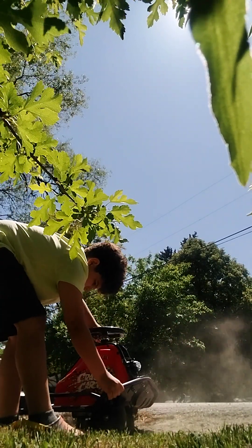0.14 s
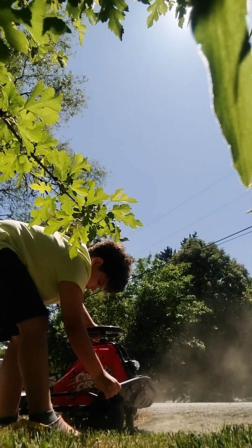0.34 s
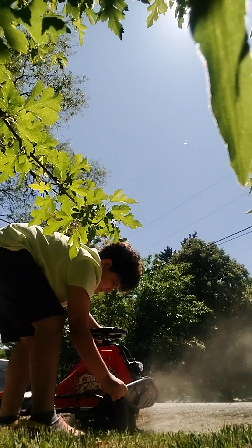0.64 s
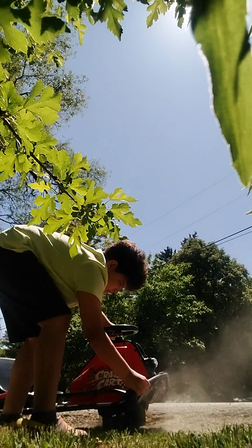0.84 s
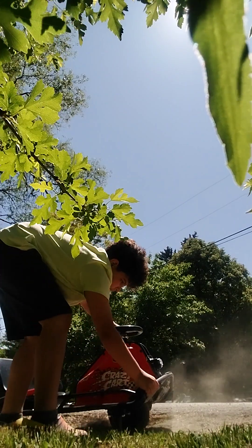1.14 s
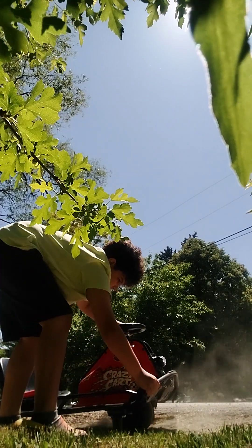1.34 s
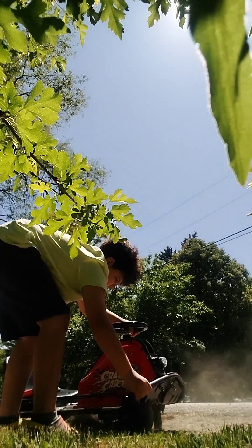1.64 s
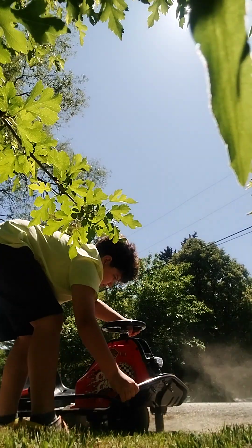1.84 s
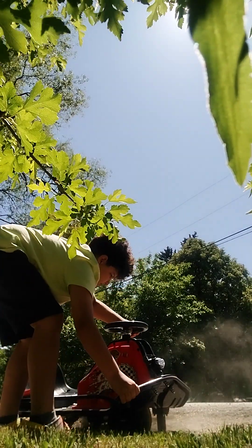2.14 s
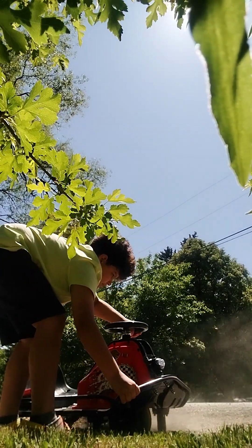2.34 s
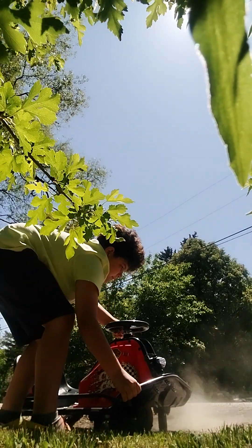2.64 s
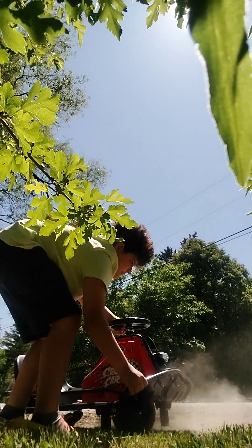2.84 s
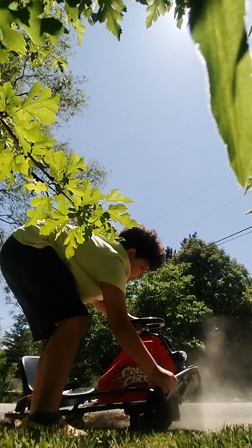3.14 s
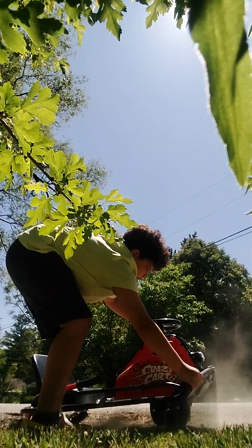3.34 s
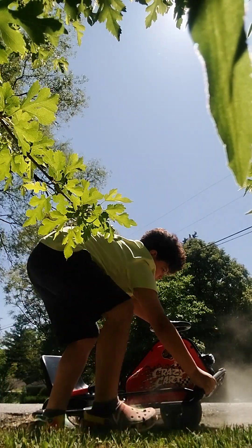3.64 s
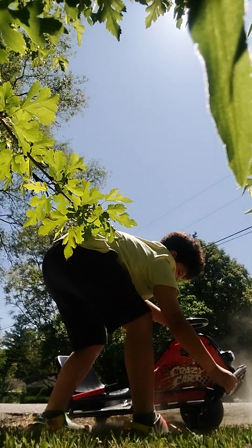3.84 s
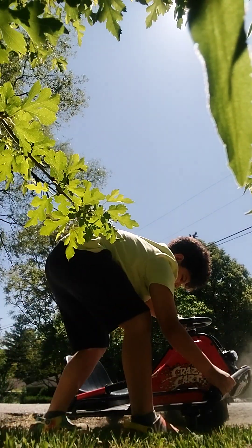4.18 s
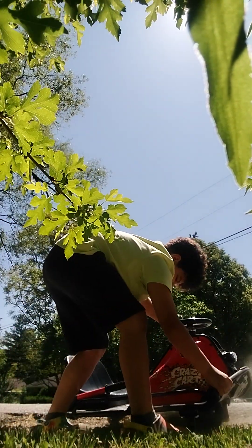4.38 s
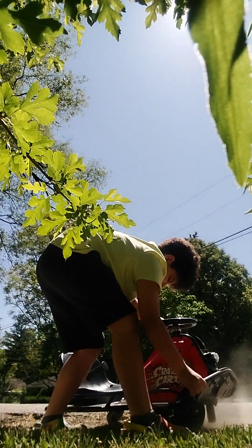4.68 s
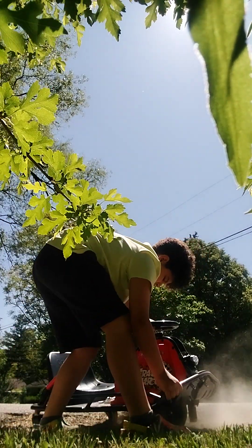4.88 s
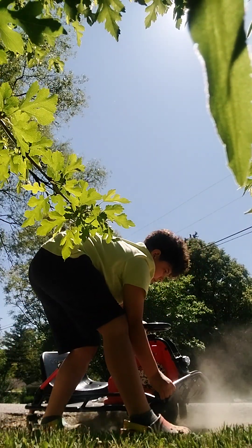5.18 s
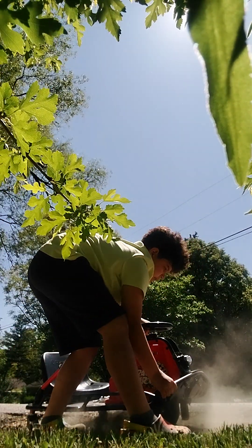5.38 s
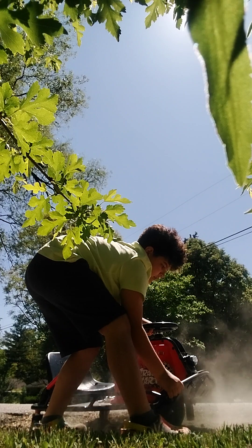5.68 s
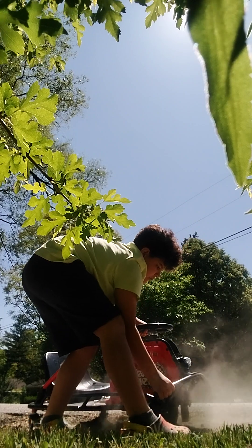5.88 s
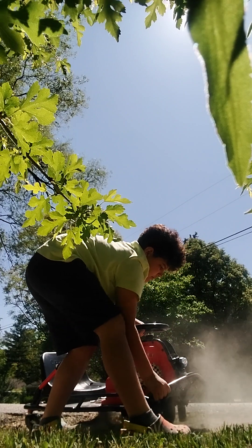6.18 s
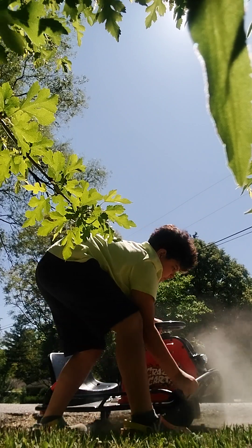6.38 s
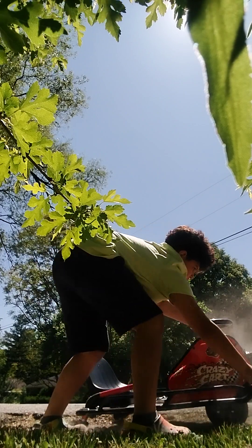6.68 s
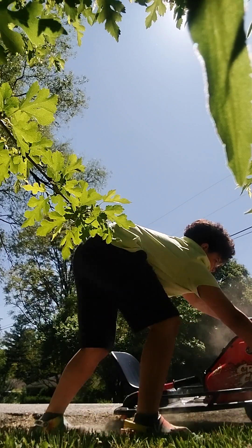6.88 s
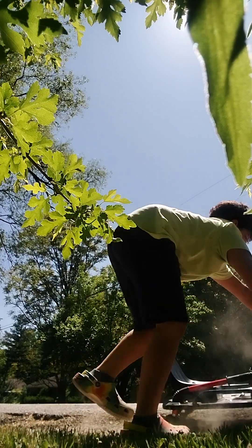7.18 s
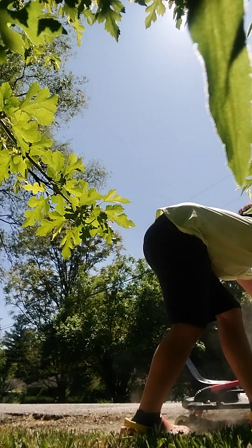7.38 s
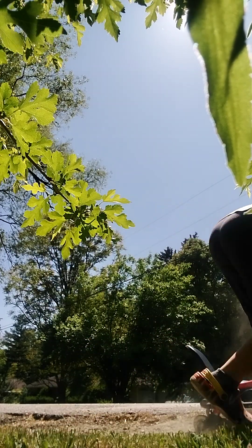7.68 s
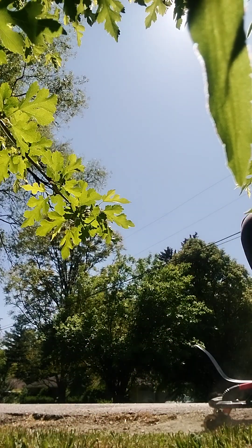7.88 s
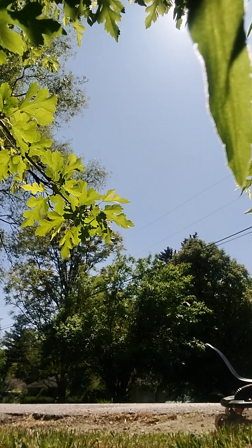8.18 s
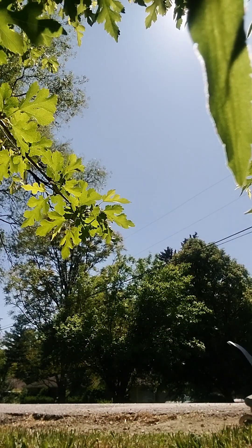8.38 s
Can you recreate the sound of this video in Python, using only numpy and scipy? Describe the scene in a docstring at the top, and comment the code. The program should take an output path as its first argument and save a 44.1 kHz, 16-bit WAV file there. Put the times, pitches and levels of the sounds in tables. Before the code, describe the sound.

Outdoors on a gritty road edge, heard close in phone-like stereo. From 0 s a small electric kart is held back while its wheel spins: hissing grit, stuttering hollow drumming around 250 Hz and a mid-range steel rattle, with thin high motor rings fading by 1.5 s. A few stones ping early and near 3.2 s. Chain whine sags from about 380 to 280 Hz in the first 0.9 s; it returns higher, 410-500 Hz, at 2.1-3 s, then lower near 4, 5.2 and 6.2 s. A rough narrow squeal near 1.9 kHz sounds at 1.6-2.7 s, with a bright grit puff at 2.4 s. Hard thuds crowd 2-6.9 s. From 7 s the noise falls away to a faint breathy whirr, ticks and a soft drag at 8 s. At 8.3 s the wheel bites again, rattling to the end. A faint 78 Hz distant machine hum, traffic and leaves persist throughout.

```python
"""From the start a small electric kart is held back while its drive wheel spins and skips on a gritty road edge.
Noise through resonances makes the tyre drum the hollow shell, the frame rattle and the grit hiss; shaken sines
make thin motor rings at first, then a rough squeal. Landings thud, stones ping, and chain whine comes in spells.
Near the end the wheel coasts with a whirr and ticks of filtered noise, then bites again.
A distant machine, a few harmonics, and a noise bed of far traffic and leaves lie under it throughout."""
import sys
import numpy as np
from scipy import signal
from scipy.fft import rfft, irfft, next_fast_len
from scipy.io import wavfile
from scipy.ndimage import map_coordinates

SR = 44100
rng = np.random.default_rng(int(sys.argv[2]) if len(sys.argv) > 2 else 0)


def wrap_up_sound(samples):
    """Save the sound to the file named by the first command line argument, as 16-bit audio."""
    columns = np.atleast_2d(samples).T
    # keep every value between -1 and 1, then stretch to whole-number steps
    tamed = np.clip(columns, -1, 1)
    steps = np.round(tamed * 32767).astype(np.int16)
    wavfile.write(sys.argv[1], SR, steps)


def volts_from_decibels(level):
    """Turn decibel levels (scalar or array-like) into linear amplitude factors."""
    exponent = np.asarray(level, float) / 20
    return 10 ** exponent


N = 375725


def unit(x):
    """Scaled to rms 1."""
    return x / np.sqrt(np.mean(x ** 2) + 1e-20)


def along(points, hz):
    """Reads (frequency [Hz], value) points on a log frequency axis."""
    f, v = np.transpose(points)
    return np.interp(np.log(hz + 1), np.log(f + 1), v)


def curves(rows):
    """One value per sample for each column after the time."""
    s, *cols = np.transpose(rows)
    return [np.interp(np.arange(N) / SR, s, c) for c in cols]


def wobble(rate):
    """A smooth random curve with `rate` knots a second."""
    knots = rng.standard_normal(int(N * 200 / SR) + 4)
    return map_coordinates(knots, [np.arange(N) * rate / SR])


def filtered(x, response):
    """x times a complex response of frequency."""
    m = next_fast_len(N + SR // 4)
    return irfft(rfft(x, m) * response(np.fft.rfftfreq(m, 1 / SR)), m)[..., :N]


def coloured(x, spectrum):
    """x through a (frequency [Hz], gain [dB]) spectrum, scaled to rms 1."""
    return unit(filtered(x, lambda hz: volts_from_decibels(along(spectrum, hz))))


def modes(table):
    """Causal response of (centre [Hz], width [Hz], gain [dB]) resonances with alternating signs."""
    def response(f):
        return sum((-1) ** k * volts_from_decibels(db) * 1j * f * width / (centre * centre - f * f + 1j * f * width)
                   for k, (centre, width, db) in enumerate(table))
    return response


def low_pass(hz):
    """Causal second-order roll-off."""
    return lambda f: hz * hz / (hz * hz - f * f + 1.4j * f * hz)


def grains(per_s, spread_db, bed):
    """Random contacts of very uneven size on a bed of noise."""
    hit = rng.random(N) < per_s / SR
    size = volts_from_decibels(spread_db * np.minimum(rng.exponential(size=N), 4)) * rng.choice([-1, 1], N)
    return unit(unit(hit * size) + bed * rng.standard_normal(N))


def bursts(rows, attack_s):
    """Envelope of (time [s], level [dB], t60 [s]) events: a quick rise, an exponential fall."""
    out, t = np.zeros(N + SR), np.arange(SR // 4) / SR
    for s, db, t60 in rows:
        fall = volts_from_decibels(db - 60 * t / max(t60, .005))
        out[round(s * SR):][:len(t)] += fall * (1 - np.exp(-t / attack_s))
    return out[:N]


def shaken_tone(rows, shake):
    """A (time [s], frequency [Hz], level [dB]) tone, its phase shaken so it spreads into a narrow band."""
    hz, db = curves(rows)
    phase = 2 * np.pi * np.cumsum(hz) / SR + shake * wobble(90)
    return volts_from_decibels(db + 3 + 3 * wobble(30)) * np.sin(phase)  # +3 dB: sine peak over its rms


# How the wheel spins in the dirt: (time [s], grit level [dB], fineness of the dust: gain above 7 kHz [dB])
SPIN = [(0, -43, 1.5), (.6, -45.5, 1.5), (1.35, -44, -2), (1.75, -40, -1.5), (2.45, -41, 4.5),
        (2.9, -39.5, 0), (3.25, -41.5, -2), (4.25, -44.5, -2.5), (5.05, -45.5, -3), (6.5, -42, -2.5),
        (6.8, -45.5, -4), (7.0, -58, -4), (7.3, -89, -3), (8.0, -87, -8), (8.3, -57.5, 6), (8.4, -64, 7),
        (8.52, -58, -11)]
# Narrow ring of the frame: (frequency [Hz], width [Hz], level against the rattle at reference spin [dB])
WHISTLE = (1402, 65, -16)


def tyre():
    """Spin throws grit and shakes the frame; bites drum the shell and shake the frame more."""
    grit_db, _ = curves(SPIN)
    spin_db = grit_db + 44  # above the reference spin, where grit is at -44 dB
    bite = bites()
    spin_rattle_db = -34 + 0.86 * spin_db
    drumming = bite + volts_from_decibels(-37.5 + 0.23 * spin_db)
    rattling = np.hypot(volts_from_decibels(spin_rattle_db), volts_from_decibels(-17) * bite)

    scrub = grains(500, spread_db=3.2, bed=0.8)  # the same contacts drive shell and frame
    rumble = coloured(rng.standard_normal(N), ROAD)
    drum = unit(shell(scrub)) + volts_from_decibels(-21.0) * rumble
    rattle = frame(scrub + 2.0 * grains(1500, spread_db=1.5, bed=0.41))
    grit = hiss(grains(3000, spread_db=4.0, bed=1.23))
    whistle = unit(filtered(rng.standard_normal(N), lambda f: modes([WHISTLE])(f) ** 2))

    skip = wobble(24)  # grip comes and goes for drum, rattle and grit at once
    drum_db = 1.4 * skip + 1.2 * wobble(45)
    shake_db = 1.3 * skip + 1.3 * wobble(40)
    lurch_db = 1.67 * wobble(8)  # slower unevenness of the frame rattle
    spray_db = 1.3 * skip + .8 * wobble(12)
    whistle_db = spin_rattle_db + WHISTLE[2] + .5 * spin_db + 2 * wobble(14)  # follows spin most steeply
    return (drumming * volts_from_decibels(drum_db) * drum
            + volts_from_decibels(whistle_db) * whistle
            + rattling * volts_from_decibels(shake_db + lurch_db) * rattle
            + volts_from_decibels(grit_db + spray_db) * grit)


# The tyre bites the ground: (time [s], length before a fixed fall time is added [s], drumming gain [dB])
BITES = [(0, 0.046, -23), (0.236, 0.46, -35), (0.688, 0.15, -21.5), (0.816, 0.14, -18.5), (1.019, .48, -18),
         (1.533, 0.21, -16.5), (1.782, 0.39, -27.5), (1.985, 0.062, -20), (2.2, 0.05, -26),
         (2.613, 0.21, -25.5), (3, 0.23, -18), (3.276, 0.17, -17), (3.498, 0.31, -19.5),
         (3.832, 0.33, -23.5), (4.103, 0.2, -31), (4.291, 0.32, -19), (4.663, 0.35, -23.5),
         (5.022, 0.43, -26), (5.385, 0.042, -19), (5.469, 0.052, -20.5), (5.557, 0.34, -21),
         (5.925, 0.48, -29), (6.427, 0.23, -21.5), (6.556, 0.41, -18.5), (6.996, 0.21, -29),
         (7.193, 0.18, -37), (7.287, 0.048, -35), (7.4, 0.13, -36.5), (7.593, 0.099, -41.5),
         (7.814, 0.11, -45), (8.311, .25, -21.5)]


def bites():
    """Gain of the drumming: each bite sets in, sags while it lasts and lets go."""
    rise_s, fall_s, sag_db_per_s = 0.036, 0.071, 6.5
    out = np.zeros(N + SR)
    for s, length, db in BITES:
        t = np.arange(round((length + fall_s) * SR)) / SR
        ramps = np.clip(np.minimum(t / rise_s, (t[-1] - t) / fall_s), 0, 1)
        out[round(s * SR):][:len(t)] += volts_from_decibels(db - sag_db_per_s * t) * ramps
    return out[:N]


# The wheel lands hard, levels before the layer trims: (time [s], shell push [dB], frame jar [dB])
LANDINGS = [(0.421, -30, -32), (0.83, -10, -21), (0.879, -10, -23), (0.926, -2, -21.5), (1.094, -19, -24),
            (1.257, -1, -27), (1.398, -5, -23.5), (1.566, -22, -18), (1.719, -20, -18),
            (1.995, -0.5, -19.5), (2.012, -8.5, -26), (2.023, -8, -20), (2.063, -3.5, -28),
            (2.169, 3.5, -21.5), (2.64, -8.5, -27), (3.014, 0, -20.5), (3.044, 2.5, -20.5),
            (3.167, 1, -23.5), (3.285, 2, -18.5), (3.392, -3, -23.5), (3.603, 0, -19), (3.707, 3.5, -25),
            (4.027, -12, -24), (4.21, -8, -26), (4.343, 2, -24), (4.424, 3, -28), (4.555, -7, -25.5),
            (5.035, 3.5, -30), (5.195, -8.5, -25), (5.425, 0, -24.5), (5.576, -3.5, -43),
            (5.66, -0.5, -21.5), (5.676, -7.5, -25), (5.822, -6, -21), (5.861, -11, -30),
            (6.544, -2.5, -25), (6.607, -13, -15), (6.859, 0, -26.5), (6.872, 1, -27), (6.917, 1, -35),
            (6.978, -7, -43.5), (7.107, -11, -34), (7.2, -23, -38), (7.303, -8, -40), (7.438, -15, -59),
            (7.68, -18, -55), (7.753, -11.5, -51), (7.831, -20, -42), (8.2, -18, -45), (8.367, -3, -25.5),
            (8.43, -2, -27)]


def landings():
    """Each landing is one soft push that rings the shell and a moment of frame rattle."""
    def push(rows):
        return shell(bursts([(s, db, 0.009) for s, db in rows], attack_s=0.0006))
    one_peak = np.abs(push([(0, 0.0044)])).max()
    thud = push([(s, db) for s, db, _ in LANDINGS]) / one_peak
    shakes = [(s, db, 0.086) for s, _, db in LANDINGS]
    cracks = [(s, db - 0.5, 0.01) for s, _, db in LANDINGS]  # the first instant of a jar
    jar = bursts(shakes + cracks, attack_s=0.0011) * frame(rng.standard_normal(N))
    return volts_from_decibels(-10.5) * thud + volts_from_decibels(-1.5) * jar


# Modes of the hollow shell: (frequency [Hz], width [Hz], gain [dB])
BODY = [(233.1, 37.9, -2), (256, 37.4, 1), (285, 64.5, -4.5), (427, 52.6, -10.5), (467, 106, -15.5)]
# Rumble under the shell's modes, played by tyre(): (frequency [Hz], relative density [dB])
ROAD = [(30, -37), (55, -6), (100, 24.5), (170, 20.5), (220, -14)]


def shell(x):
    """The hollow body: its modes, deaf to sharp contact and too small to radiate deep bass."""
    def small(f):
        return (1 - low_pass(hz=110)(f)) * f * f / (f * f - 185 ** 2 - 1.2j * f * 185)
    return filtered(x, lambda f: modes(BODY)(f) * low_pass(hz=600)(f) ** 2 * small(f))


# Modes of the steel frame: (frequency [Hz], width [Hz], gain [dB])
FRAME = [(668, 65, 6), (830, 55, 5), (1140, 60, 3)]
# Broad colour of the rattle: (frequency [Hz], relative density [dB])
RATTLE = [(200, -35), (350, -1), (530, -4), (900, -4), (1300, -11.5), (1600, -14.5), (2100, -19),
          (2700, -27), (4000, -29.5), (8000, -120)]


def frame(x):
    """The steel frame: a broad rattle with a few modes standing out."""
    ring = filtered(x, lambda f: modes(FRAME)(f) * low_pass(hz=2000)(f) ** 2)
    return unit(coloured(x, RATTLE) + 0.28 * unit(ring))


# Colour of the grit: (frequency [Hz], relative density [dB])
GRIT = [(1500, -30), (2600, -14), (3450, -13), (3600, -3), (4400, -5), (5000, -3), (6700, -1), (7300, -6),
        (8700, -15), (10000, -7), (11500, -3), (13300, -1), (15000, -4), (15900, -4)]
# Motor casing rings in the hiss: (frequency [Hz], width [Hz], gain [dB])
CASING = [(3680, 70, 0), (4050, 140, 2), (4800, 90, 0), (6090, 90, 0), (6530, 80, 0), (11200, 120, 0),
          (12930, 100, -2)]


def hiss(x):
    """Grit colour with the casing's rings; its treble follows the fineness of the dust."""
    casing = filtered(x, lambda f: 1 + .9 * np.abs(modes(CASING)(f)))
    ringing = coloured(casing, GRIT)
    top = filtered(ringing, lambda f: f > 7000)
    _, fineness_db = curves(SPIN)
    return ringing + (volts_from_decibels(fineness_db) - 1) * top


# Stones and wheel ticks, levels before the layer trims: (time [s], puff level [dB], scrape over puff [dB])
TICKS = [(.283, -26, -6), (.751, -29.5, 6), (.8414, -24, -4), (1.1975, -25, 11), (1.3407, -28.5, 10),
         (2.425, -3, -23), (2.6167, -20, -13), (3.284, -25.5, 3), (3.684, -21, -19), (4.3185, -29.5, 16),
         (4.9997, -29.5, 6.5), (6.61, -20.5, 11), (6.909, -28.5, 13), (6.942, -24.5, -3),
         (6.977, -28.5, 0.5), (7.0663, -39, 7), (7.104, -30.5, 4.5), (7.1996, -30, 0.5), (7.2489, -38, 5),
         (7.33, -36.5, 5.5), (7.422, -45.5, 12), (7.499, -36, 5), (7.511, -31, -10), (7.5472, -50, 6),
         (7.59, -44, 5), (7.6615, -43.5, 4), (7.7493, -41, 8), (7.8308, -44, 3), (7.9047, -51, 9),
         (8.15, -50.5, 14.5), (8.203, -35.5, 5.5), (8.268, -41, 0), (8.285, -39, 2), (8.374, -29.5, -6),
         (8.424, -28.5, 10.5), (8.441, -28.5, 12)]
# Colour of the tyre dragging on grit: (frequency [Hz], relative density [dB])
SCRAPE = [(250, -26), (420, 10), (600, 7), (1000, -4), (1900, -10.5), (2800, -16.5), (4000, -44),
          (7000, -120)]
# A soft drag while coasting: (time [s], level [dB], t60 [s])
SWISH = (8.005, -42.5, 0.21)


def ticks():
    """Short bright puffs of grit over a duller scrape, and one soft swish."""
    t60_s, drag_s_per_db = .042, .0012  # more scrape, longer puff
    puff = bursts([(s, db, t60_s + drag_s_per_db * rel_db) for s, db, rel_db in TICKS], attack_s=.0006)
    scrape = bursts([(s, db + rel_db, 2.4 * t60_s) for s, db, rel_db in TICKS], attack_s=0.0021)
    noise = rng.standard_normal((3, N))
    soft = coloured(noise[2], [(800, -18), (1600, 11), (3000, 1), (6000, -16), (12000, -20)])
    swish = bursts([SWISH], attack_s=0.017) * soft
    return volts_from_decibels(-7.0) * puff * hiss(noise[0]) + volts_from_decibels(-2.5) * scrape * coloured(noise[1], SCRAPE) + swish


# Small stones strike the frame: (time [s], level of the lower partial [dB], its frequency [Hz])
PINGS = [(.114, -38, 2450), (.2838, -33, 3200), (.417, -37, 2950), (.429, -35, 2600), (.719, -39, 7000),
         (3.154, -31, 5900), (7.313, -49, 5500)]


def pings():
    """Each stone gives a short ring of two close partials."""
    out, t = np.zeros(N + SR), np.arange(SR // 10) / SR
    for s, db, hz in PINGS:
        ring = np.sin(2 * np.pi * hz * t)
        ring += .6 * np.sin(2 * np.pi * 1.07 * hz * t + 6 * rng.random())
        fall = volts_from_decibels(db - 60 * t / .032)  # t60 32 ms
        out[round(s * SR):][:len(t)] += fall * (1 - np.exp(-t / 0.00035)) * ring
    return out[:N]


# Chain drive, one list per spell, before the body colours it: (time [s], tooth rate [Hz], level [dB])
WHINE = [
    [(0, 378, -28), (.17, 358, -29), (.23, 326, -27), (.37, 283, -20), (.45, 285, -22), (.495, 298, -28)],
    [(.495, 305, -26), (.55, 300, -24), (.63, 284, -23), (.76, 318, -25), (.85, 335, -28)],
    [(2.08, 445, -34), (2.24, 475, -25), (2.37, 501, -25.5), (2.47, 482, -28), (2.63, 480, -26),
     (2.68, 446.4, -33.5), (2.85, 427, -26.5), (3.0, 414, -23)],
    [(3.84, 301.4, -23), (3.97, 308.3, -42), (4.08, 299.3, -29), (4.16, 278.8, -20.5), (4.27, 264, -20),
     (4.37, 250, -20.5)],
    [(5.06, 288.8, -35), (5.17, 291.8, -25), (5.25, 270.2, -23.5), (5.36, 269, -28.5), (5.41, 244, -18),
     (5.5, 243, -21.5)],
    [(5.95, 324.8, -32.5), (6.2, 318, -30.5), (6.31, 313.6, -23), (6.37, 276, -20), (6.44, 263.2, -22),
     (6.55, 210, -35)],
]
# Overtones of the chain: (multiple of the tooth rate, level against the first [dB])
OVERTONES = [(2, -8), (3, -12), (4, -18)]
# Overtone gain in each spell, clear when the wheel runs free and muffled under load: gain [dB]
CLEAR_DB = [0, -5, 3.5, -7, -6, -6]
# What the body passes of the chain's tone: (frequency [Hz], gain [dB])
RADIATES = [(250, 0), (325, 0), (350, -15), (375, -19), (430, -4), (490, -5), (570, -12), (660, -7),
            (740, -1), (860, -7), (1000, -12), (1500, -15)]


def whine():
    """Chain teeth give a slightly unsteady tone with a few overtones, coloured by the body."""
    out, t = 0, np.arange(N) / SR
    for rows, clear_db in zip(WHINE, CLEAR_DB):
        hz, db = curves(rows)
        fade = np.clip(np.minimum(t - rows[0][0], rows[-1][0] - t) / .03, 0, 1)
        jitter = .0115 - .0009 * clear_db  # the more muffled, the more the tooth rate shakes
        turn = 2 * np.pi * np.cumsum(hz * (1 + jitter * wobble(50))) / SR
        tone = volts_from_decibels(db + along(RADIATES, hz) + 3.2 * wobble(35)) * np.sin(turn)
        for k, rel_db in OVERTONES:
            over_db = db + rel_db + clear_db + along(RADIATES, k * hz) + 2.5 * wobble(40)
            tone += volts_from_decibels(over_db) * np.sin(k * (turn + .14 * wobble(60)))  # overtones blur
        out = out + np.sqrt(2) * fade * tone
    return out


# Rough ring while the wheel spins hard: (time [s], frequency [Hz], level [dB])
SQUEAL = [(1.45, 1780, -120), (1.6, 1795, -50), (1.85, 1870, -47), (2.2, 1942, -46), (2.6, 1907, -45),
          (2.8, 1899, -120)]


def squeal():
    """A strongly shaken tone, heard as a rough narrow band."""
    return shaken_tone(SQUEAL, shake=2.2)


# Thin high ring of the motor at low spin: (time [s], frequency [Hz], level [dB])
CASING_RING = [(0, 4080, -64), (.15, 4110, -61), (.6, 4120, -61), (.72, 4030, -61), (1.0, 4030, -62),
               (1.3, 4050, -75), (1.5, 4050, -120)]
# Its lower partner: (time [s], frequency [Hz], level [dB])
LOWER_RING = [(0, 3700, -75), (.4, 3700, -63), (1.05, 3690, -61), (1.5, 3690, -100)]


def motor_rings():
    """Two thin high tones, lightly shaken."""
    return shaken_tone(CASING_RING, shake=0.94) + shaken_tone(LOWER_RING, shake=1.0)


# Breathy whirr while the wheel coasts: (time [s], frequency [Hz], level [dB])
COAST_WHIRR = [(7.2, 684, -120), (7.4, 679, -59), (7.9, 643, -54), (8.05, 617, -82), (8.2, 600, -120)]


def coast_whirr():
    """A tone shaken so hard that it turns breathy."""
    return shaken_tone(COAST_WHIRR, shake=3.5)


# Distant machine: (time [s], frequency [Hz], level before the harmonic's own [dB])
HUM = [(0, 76.4, -40.5), (.28, 80, -47.5), (.66, 81, -41.5), (1.83, 79.3, -43.5), (3.7, 77.44, -37.5),
       (4.6, 80.15, -42.5), (6.57, 77.6, -41), (7.0, 77.5, -35), (8.52, 78.1, -37.5)]
# Its harmonics: (multiple, level [dB])
HUM_ORDERS = [(1, -0.5), (2, -11), (3, -10)]


def hum():
    """A low tone with two harmonics, each wavering a little."""
    hz, db = curves(HUM)
    turn = 2 * np.pi * np.cumsum(hz) / SR
    return np.sqrt(2) * sum(volts_from_decibels(db + rel_db + 1.1 * wobble(2.34)) * np.sin(k * turn)
                            for k, rel_db in HUM_ORDERS)


# Far traffic and leaves: (frequency [Hz], relative density [dB])
STREET = [(25, -24), (55, -3), (120, 4), (240, -4), (420, -25), (660, -9), (850, -44), (2000, -32),
          (3000, -35.5), (5500, -42.5), (8500, -62), (13000, -64), (15800, -49)]


def street():
    """Coloured noise that slowly swells and sinks around -45.5 dB."""
    return volts_from_decibels(-45.5 + 0.98 * wobble(4.6)) * coloured(rng.standard_normal(N), STREET)


def scatter(x):
    """Reflections: fixed ones off the ground nearby, ever-changing ones off leaves and dust."""
    t = np.arange(SR // 20) / SR
    echo = rng.standard_normal(len(t)) * volts_from_decibels(-60 * t / 0.24)
    ground = signal.fftconvolve(x, echo / np.linalg.norm(echo))[:N]
    z = signal.stft(x, nperseg=256)[2]
    random_phase = np.exp(2j * np.pi * rng.random(z.shape))
    leaves = signal.istft(z * random_phase, nperseg=256)[1][:N]
    return .55 * ground + 1.2 * filtered(leaves, lambda hz: hz > 350)


# Nominal left-right likeness, before the scatter's own gains: (frequency [Hz], likeness [0 to 1])
ALIKE = [(300, 1), (800, .96), (1500, .9), (2500, .6), (5000, .35), (15000, .3)]


def scene():
    """Direct sound at both ports plus scatter of opposite sign at each."""
    wheel = tyre() + landings() + ticks() + pings()
    tones = whine() + squeal() + motor_rings() + coast_whirr()
    direct = wheel + tones + hum() + street()

    def angle(hz):
        return np.arccos(np.clip(along(ALIKE, hz), 0, 1)) / 2
    soft_ends = signal.windows.tukey(N, .003)
    mid = filtered(direct, lambda hz: np.cos(angle(hz)))
    side = scatter(filtered(direct * soft_ends, lambda hz: np.sin(angle(hz))))
    return np.array([mid + side, mid - side])


def band_limit(x):
    """A steep low-pass at the top of the band."""
    return signal.sosfilt(signal.butter(12, 17010, fs=SR, output="sos"), x)


# Colour of the two ports: (frequency [Hz], left over right [dB])
PORTS = [(60, -9), (99, -1.5), (160, -1.5), (270, -1.5), (450, -2.5), (740, -7), (1220, -2), (2010, 1),
         (3330, 6.5), (5500, 9), (9080, 7), (15000, 4)]
# Left port behind the right: (frequency [Hz], phase lag [rad])
LAG = [(0, -0.5), (200, 0.42), (700, 0.76), (1400, 1.11), (2400, 2), (4400, 5.5), (8800, 13), (16000, 20)]


def record(dry):
    """Two ports on a phone body: each has its own colour, the left one hears later."""
    def port(hz):
        return volts_from_decibels(along(PORTS, hz) / 2) * np.exp(-.5j * np.interp(hz, *np.transpose(LAG)))

    def response(hz):
        band = (hz < 15880) * (1 - low_pass(hz=40)(hz))
        return np.array([port(hz), 1 / port(hz)]) * band
    wet = filtered(dry, response)
    mix = wet / (1 + np.abs(wet / 1.3) ** 4) ** (1 / 4)  # soft overload towards 1.3
    return band_limit(mix)


dry = scene()
out = record(dry)
wrap_up_sound(out)
```